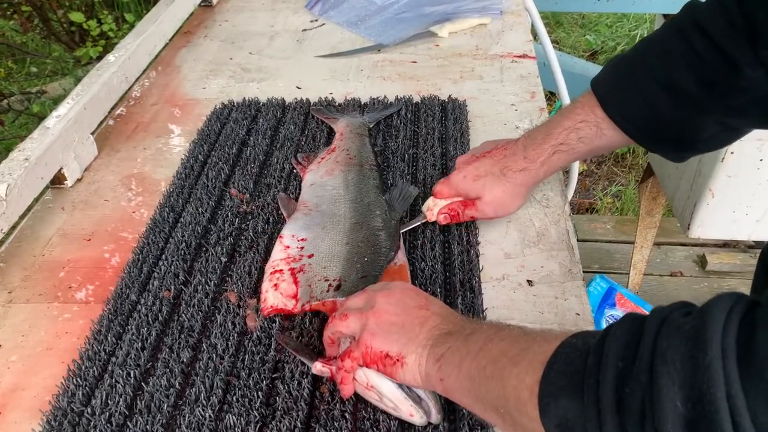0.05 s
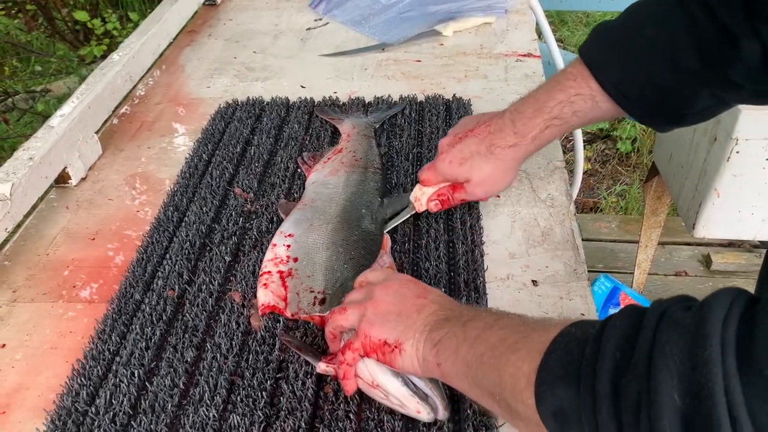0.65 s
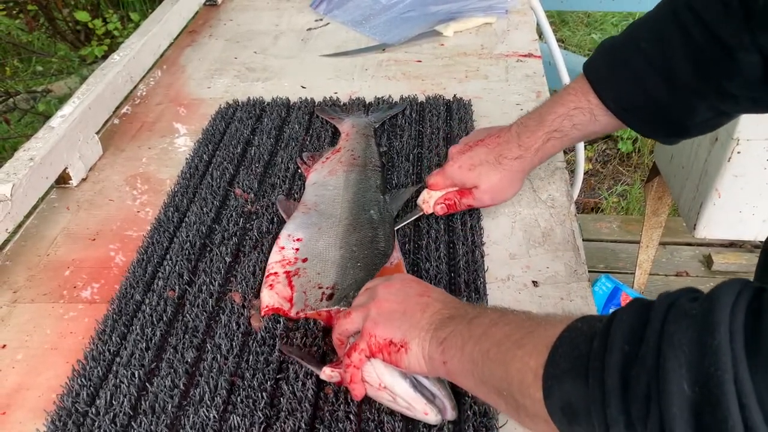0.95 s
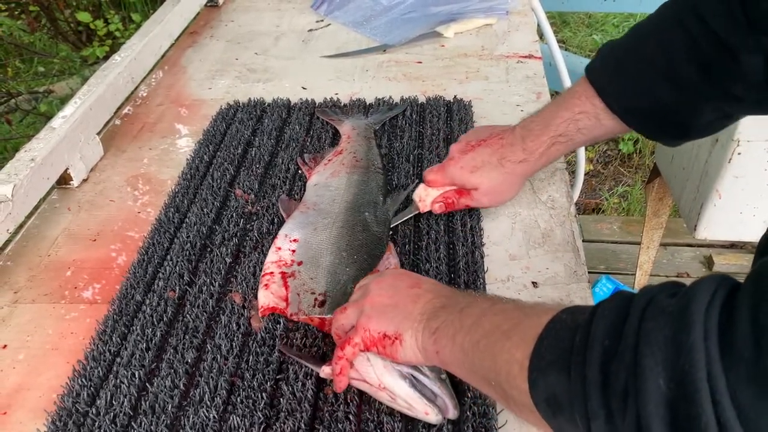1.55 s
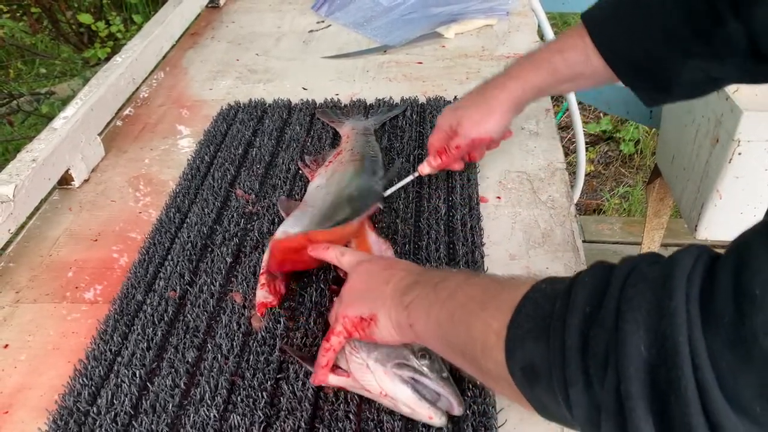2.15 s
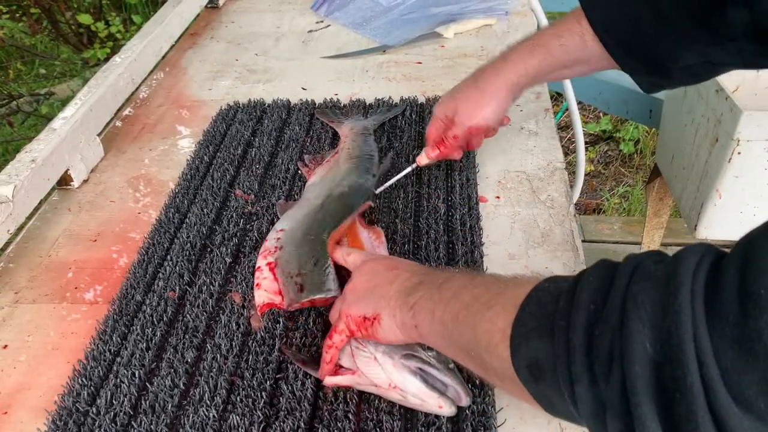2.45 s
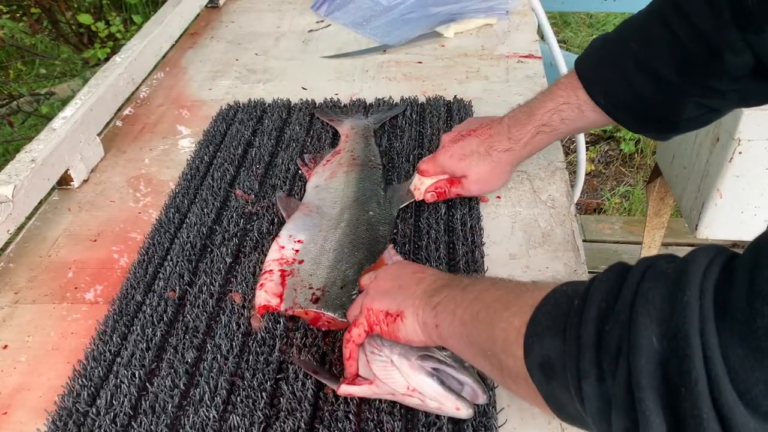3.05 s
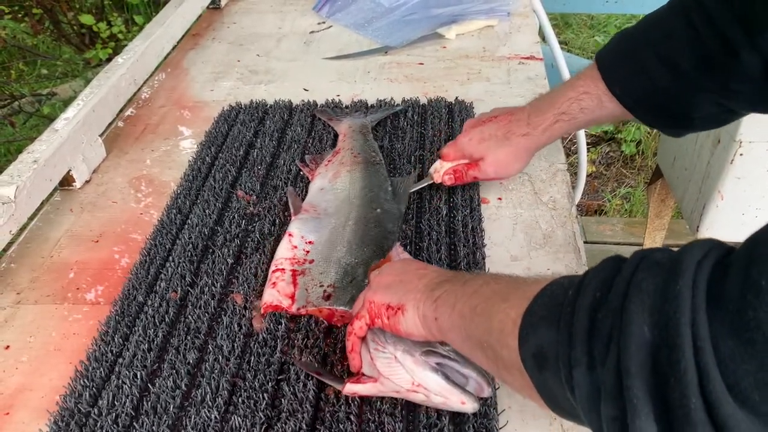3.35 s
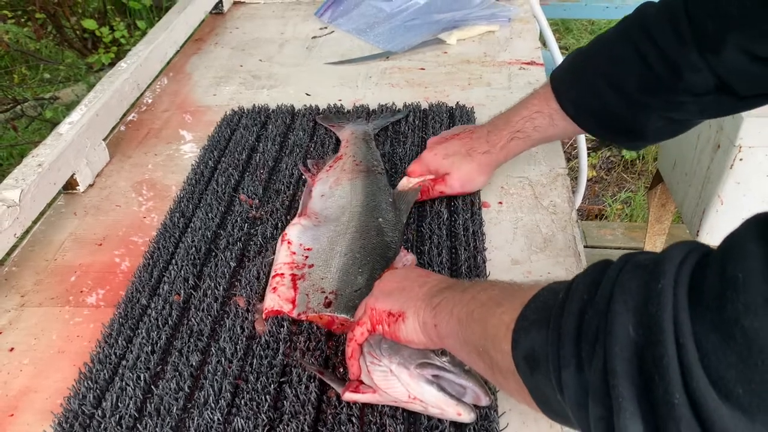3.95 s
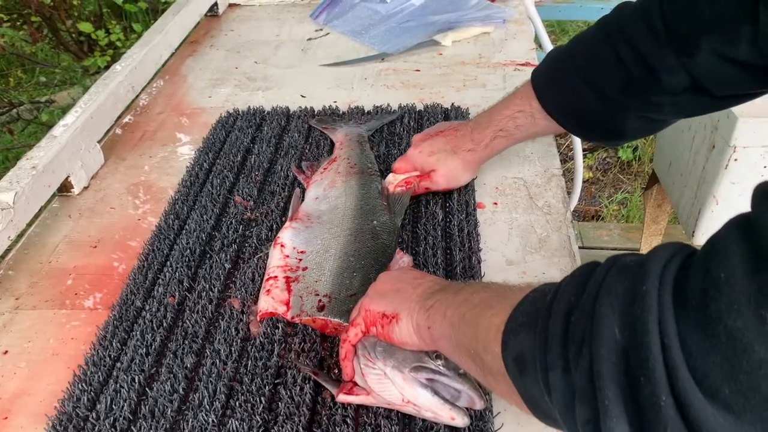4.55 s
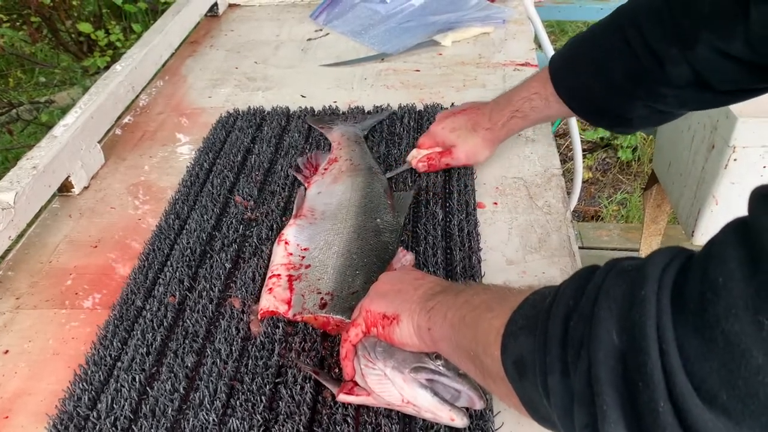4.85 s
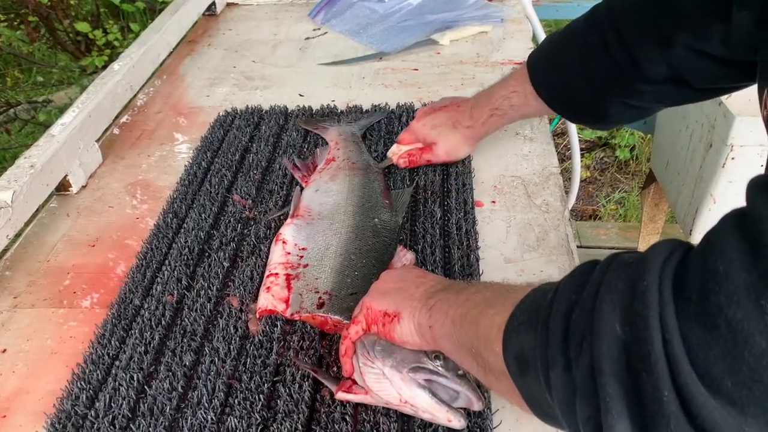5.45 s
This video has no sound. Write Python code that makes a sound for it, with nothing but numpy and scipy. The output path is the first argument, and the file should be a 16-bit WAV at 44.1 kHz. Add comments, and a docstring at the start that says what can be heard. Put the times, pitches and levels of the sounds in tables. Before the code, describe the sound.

Quiet, short knife strokes sizzle through wet fish flesh and click over small bones on a table, over faint outdoor air.

```python
"""An outdoor table with a rubber mat: a filleting knife works along a salmon's backbone in short strokes.
The edge crackles through skin, snaps small bones and sinks into wet flesh that fizzes and pops,
while the table rumbles under the pressure. Something hollow nearby is knocked, chatters and settles.
A palm shifts the fillet twice; faint outdoor air lies behind it all."""
import sys
import numpy as np
from scipy import signal
from scipy.fft import rfft, irfft, next_fast_len
from scipy.io import wavfile

SR = 44100
rng = np.random.default_rng(int(sys.argv[2]) if len(sys.argv) > 2 else 0)


def wav_record(signal):
    """Record a signal, one row per channel, as 16-bit PCM in the file named by sys.argv[1]."""
    frames = np.transpose(np.atleast_2d(signal))
    bounded = np.clip(frames, -1, 1)
    # unit amplitude maps onto the largest positive 16-bit level
    quanta = np.round(bounded * 32767).astype(np.int16)
    wavfile.write(sys.argv[1], SR, quanta)


N = 242853
TIME = np.arange(N) / SR
FFT_SIZE = next_fast_len(N + SR // 10, True)
FREQS = np.maximum(np.fft.rfftfreq(FFT_SIZE, 1 / SR), 1)


def from_db(db):
    """Decibels to gain."""
    return 10 ** (np.asarray(db) / 20)


def rms_one(x):
    """Scale to unit rms."""
    return x / np.sqrt(np.mean(x ** 2) + 1e-20)


def in_time(points):
    """Read an automation curve at every sample."""
    return np.interp(TIME, *np.transpose(points))


def at_freqs(points):
    """Read a curve over log frequency."""
    hz, value = np.transpose(points)
    return np.interp(np.log(FREQS), np.log(hz), value)


def filtered(x, response):
    """Apply a frequency response."""
    return irfft(rfft(x, FFT_SIZE) * response, FFT_SIZE)[..., :N]


def colour(x, eq):
    """Shape a signal with an EQ curve, then scale to unit rms."""
    return rms_one(filtered(x, from_db(at_freqs(eq))))


def drift(rate_hz):
    """Slow random modulation of unit rms."""
    return rms_one(filtered(rng.standard_normal(N), 1 / (1 + (FREQS / rate_hz) ** 2)))


def taps(times, sizes):
    """A train of single impulses."""
    return np.bincount(np.clip(np.round(np.asarray(times) * SR).astype(int), 0, N - 1), sizes, N)


def fade(x, t60):
    """Give each impulse an exponential tail."""
    return signal.lfilter([1], [1, -from_db(-60 / (t60 * SR))], x + 1e-18)


def ring(x, hz, t60):
    """A resonator: a unit impulse starts a decaying sine of height 1."""
    r, w = from_db(-60 / (t60 * SR)), 2 * np.pi * hz / SR
    return signal.lfilter([0, r * np.sin(w)], [1, -2 * r * np.cos(w), r * r], x + 1e-18)


def from_right(x, lag_s):
    """Sound from the right reaches the left microphone later."""
    return np.array([filtered(x, np.exp(-2j * np.pi * FREQS * lag_s)), x])


def lean(x, balance):
    """Pan each frequency by a left-minus-right curve."""
    return filtered(x, from_db(at_freqs(balance) * np.array([[.5], [-.5]])))


def grains(per_s, spread_db, low_hz, high_hz, cycles, count=16):
    """Tiny random ruptures, each ringing a few cycles at one of `count` pitches; unit rms."""
    sizes = from_db(spread_db * np.minimum(rng.exponential(1, N), 4)) * rng.choice([-1, 1], N)
    ruptures = sizes * (rng.random(N) < per_s / SR)
    voice = rng.integers(0, count, N)
    pitches = np.geomspace(low_hz, high_hz, count)
    return rms_one(sum(hz * ring(ruptures * (voice == k), hz, cycles / hz) for k, hz in enumerate(pitches)))


def slips(per_s, t60, drag, spread_db):
    """The blade catches and lets go at uneven intervals over a steady drag; a gain of unit rms."""
    times = np.cumsum(rng.uniform(.3, 1.7, 2000)) / per_s
    sizes = from_db(rng.normal(0, spread_db, len(times))) * (times < N / SR)
    return rms_one(np.hypot(drag, fade(taps(times, sizes), t60)))


def stroke(start, length, swell_db_per_s, release_t60, attack_s=0.0098):
    """Envelope of one stroke: it bites, swells as the blade sinks in, and dies away."""
    t = np.arange(0, length + release_t60, .001)
    bite = np.minimum(t / attack_s, 1)
    swell = from_db(swell_db_per_s * np.minimum(t - length, 0))
    release = from_db(-60 * np.maximum(t - length, 0) / release_t60)
    return np.interp(TIME, start + t, bite * swell * release, right=0)


def knife_work():
    """Envelopes for edge, flesh and table: the strokes ride on the blade's unsteady creep."""
    # pushes of the knife, with relative levels at their end: t/s, length/s, edge/dB, flesh/dB, table/dB
    strokes = [(0.0, 0.0077, -37, -39.5, -41.5), (0.10, 0.023, -61, -68, -65), (1.083, 0.11, -41, -46, -46),
               (1.252, 0.029, -47, -48, -49.5), (1.443, 0.052, -58, -51, -54),
               (1.868, 0.12, -45.5, -54, -52), (2.052, 0.09, -48.5, -59, -70),
               (2.506, 0.15, -49, -51.5, -50), (2.913, 0.025, -46.5, -45, -59),
               (3.143, 0.057, -40, -51.5, -52), (3.244, 0.035, -38.5, -43.5, -45.5),
               (3.791, 0.22, -44.5, -51.5, -51), (4.017, 0.027, -41.5, -45, -45.5),
               (4.12, 0.11, -47.5, -68, -49.5), (4.464, 0.073, -58, -50.5, -50.5),
               (4.611, 0.042, -49, -53, -53), (4.677, 0.077, -43.5, -43.5, -44.5),
               (4.809, 0.029, -35, -42.5, -43.5), (4.851, 0.021, -41.5, -47.5, -46),
               (4.894, 0.012, -51, -48, -46), (5.409, 0.11, -39.5, -48, -44.5)]
    # between strokes the blade stays in the fish and creeps: t/s, relative edge level/dB
    creep = [(0, -52.5), (.25, -55.5), (.55, -59), (.95, -53.5), (1.3, -55), (1.7, -52), (2.0, -56),
             (2.4, -60.5), (2.8, -55), (3.05, -52.5), (3.3, -54.5), (3.5, -59), (3.75, -56.5), (4.2, -52),
             (4.4, -57.5), (4.7, -47), (5.12, -52.5), (5.33, -56)]
    creep_flesh_db, creep_table_db = -59.5, -54.5
    cutting = rubbing = pressing = 0
    for start, length, edge_db, flesh_db, table_db in strokes:
        cutting += from_db(edge_db) * stroke(start, length, swell_db_per_s=30, release_t60=0.21)
        rubbing += from_db(flesh_db) * stroke(start, length, swell_db_per_s=58, release_t60=0.19)
        pressing += from_db(table_db) * stroke(start, length, swell_db_per_s=58, release_t60=0.24)
    wander_db = 1.5 * drift(rate_hz=12)
    return (np.hypot(cutting, from_db(in_time(creep) + wander_db)),
            np.hypot(rubbing, from_db(creep_flesh_db + wander_db)),
            np.hypot(pressing, from_db(creep_table_db + wander_db)))


def edge(gain):
    """Fibres part in a dense wet sizzle that thickens at every slip of the blade."""
    # bright tone of parting fibres: f/Hz, level/dB
    sizzle_eq = [(1500, -40), (2700, 2.5), (3400, 0), (4400, 1), (5300, -5.5), (7000, 4.5), (9500, 3),
                 (12000, 6), (14000, 4), (15600, -1)]
    crackle = colour(grains(7000, spread_db=2, low_hz=2500, high_hz=16900, cycles=3), sizzle_eq)
    clumps = slips(per_s=140, t60=.02, drag=.42, spread_db=3)
    return gain * from_db(-2) * crackle * clumps


def flesh(gain):
    """Wet flesh drags on the blade as an uneven fizz of small bubbles."""
    # midrange tone of wet flesh: f/Hz, level/dB
    fizz_eq = [(250, -8), (450, 3), (650, -3), (900, 4.5), (1100, -1.5), (1400, 0), (2000, -4),
               (3000, -8.5), (4500, -6.5), (8000, -45)]
    fizz = colour(grains(3500, spread_db=4.0, low_hz=367, high_hz=5400, cycles=13, count=40), fizz_eq)
    clumps = slips(per_s=80, t60=0.11, drag=0.12, spread_db=2.5)
    return gain * from_db(-0.96) * fizz * clumps


def table(gain):
    """The slipping blade shakes the table top through fish and mat."""
    # low resonances of the table top: f/Hz, level/dB
    table_eq = [(60, -4), (110, -9), (160, 1.5), (205, 1), (265, -9.5), (330, -3.5), (450, -22.5),
                (800, -51)]
    shudder = grains(700, spread_db=-0.5, low_hz=97.3, high_hz=495, cycles=7.6)
    return gain * colour(shudder, table_eq)


def air():
    """A wide bed of outdoor hiss over a slowly swelling rumble."""
    # tone of the open air: f/Hz, level/dB
    air_eq = [(20, -48), (29, -30), (38, -16.5), (54, 7.5), (75, -3.5), (110, -4.5), (180, -5),
              (300, -10.5), (600, -13), (1200, -16.5), (2500, -19), (4500, -22.5), (7500, -31.5),
              (11000, -49), (15500, -25)]
    # likeness of the two sides, greatest in the bass: f/Hz, correlation
    likeness = [(60, 0.58), (130, 0), (300, 0), (650, 0.24), (1400, 0), (15000, 0)]
    # swells and lulls of the rumble: t/s, bass lift/dB
    rumble_lift = [(0, 0.5), (0.5, 2), (1.1, 1), (1.9, 5), (2.3, -6), (2.8, 0), (3.2, -3), (3.8, 0),
                   (4.3, 0.5), (4.9, 0.5), (5.5, -2.5)]
    alike = at_freqs(likeness)
    mid, side = filtered(rng.standard_normal((2, N)), np.sqrt([1 + alike, 1 - alike]))
    bed = from_db(-47.5 + 1.4 * drift(rate_hz=5.1)) * colour(np.array([mid + side, mid - side]), air_eq)
    rumble = filtered(bed, 1 / (1 + (FREQS / 90) ** 6))  # below 90 Hz
    return bed + (from_db(in_time(rumble_lift)) - 1) * rumble


def burst(times, db, t60, rise_s=.002):
    """Envelope of cracks that take a moment to run through bone, each echoing off the table side."""
    hits = taps(times, from_db(db)) + taps(times + 0.01014, from_db(db - 13.5))
    softened = fade(hits, rise_s) * np.log(1000) / (rise_s * SR)
    return fade(softened, t60)


def snaps():
    """Small bones snap under the edge: a crisp transient, a woody crack and a duller, grainy tail."""
    # breaking bones, with relative layer levels: t/s, crisp/dB, crack/dB, crunch/dB
    breaks = [(0.0084, -21, -33.5, -40.5), (0.119, -35.5, -50, -60), (0.249, -32.5, -50, -63),
              (0.3347, -25, -44, -47), (0.592, -33, -44, -54), (0.7574, -36, -52, -69),
              (0.763, -37, -52, -68), (1.024, -22, -33, -47), (1.093, -23, -38, -43.5),
              (1.1034, -21.5, -34, -53), (1.1122, -22, -48, -44), (1.1273, -19.5, -35, -50),
              (1.141, -26, -43, -50), (1.15, -21, -31, -43), (1.158, -18.5, -28, -54),
              (1.1672, -15.5, -36, -51), (1.178, -25, -43, -59), (1.189, -27, -30, -53),
              (1.27, -35, -45, -52), (1.8537, -26, -41, -63), (1.867, -25, -28.5, -64),
              (1.892, -23.5, -33, -54), (1.929, -29, -44, -56), (1.937, -18.5, -33, -54),
              (1.9643, -19, -34, -54), (1.9799, -21.5, -33.5, -48), (2.095, -31.5, -50, -62),
              (2.246, -48, -59, -68), (2.2627, -39, -54, -66), (2.6198, -22, -33, -36.5),
              (2.6896, -27, -30, -45), (2.9148, -29.5, -34, -42), (2.9226, -28.5, -31, -39.5),
              (3.109, -28, -39, -47), (3.152, -29, -48, -56), (3.1618, -27, -43, -59),
              (3.172, -19.5, -45, -62), (3.1966, -25, -39, -58), (3.2273, -25, -40, -57),
              (3.2432, -27, -28.5, -45), (3.262, -27, -44, -55), (3.27, -24, -36, -48),
              (3.277, -32, -46, -56), (3.6592, -38.5, -51, -57), (3.836, -32, -44, -60),
              (3.8577, -33, -50, -58), (3.8653, -31.5, -47, -58), (3.954, -25.5, -49, -61),
              (3.9781, -31, -50, -65), (3.9966, -28, -48, -61), (4.6005, -32, -46, -56),
              (4.6778, -32, -48, -59), (4.6898, -26, -43, -61), (4.709, -31, -52, -56),
              (4.7133, -23, -39, -45), (4.7446, -24, -38, -52), (4.798, -27, -34, -50),
              (4.821, -31, -34, -48), (4.8326, -24, -31, -45), (4.838, -26, -30, -45),
              (4.857, -27, -31, -54), (4.871, -36, -31, -50), (4.9016, -29, -31, -56),
              (4.906, -27, -28, -55), (4.9593, -30, -36, -49), (4.976, -37, -50, -64),
              (5.02, -27.5, -43, -66), (5.171, -25, -54, -67), (5.4012, -29, -37, -51)]
    # tones of the bright transient, the woody crack and the bone crunch: f/Hz, level/dB
    crisp_eq = [(1500, -28), (2700, -1), (4400, -5), (5400, -15), (7000, -0.5), (9500, 4), (12000, 7),
                (14000, 4), (15600, 7)]
    crack_eq = [(250, -7), (600, 5.5), (1000, 7), (1700, -1.5), (3000, 4), (4400, 4.5), (6500, -4.5),
                (9000, 12), (14000, -35)]
    crunch_eq = [(600, 9.5), (1500, 1.5), (2400, 21.5), (4400, 3.5), (6000, -1), (9000, -10)]
    times, crisp_db, crack_db, crunch_db = np.transpose(breaks)
    crisp = burst(times, crisp_db, t60=0.0086) * colour(rng.standard_normal(N), crisp_eq)
    crack = burst(times, crack_db, t60=0.0063) * colour(rng.standard_normal(N), crack_eq)
    grit = colour(grains(9000, spread_db=1, low_hz=400, high_hz=12000, cycles=3), crunch_eq)
    crunch = fade(taps(times, from_db(crunch_db + 2)), t60=0.067) * grit
    return crisp + crack + crunch


def short_rings():
    """Short ringing sounds: wet pops, pings of cracking bone, low table thuds and one dry tap."""
    # decaying tones of the pops, pings, thuds and tap: t/s, level/dB, f/Hz, t60/s
    tones = [(0.336, -38.5, 2120, 0.051), (0.336, -42, 317, 0.11), (0.338, -32, 172, 0.13),
             (0.593, -36, 2450, 0.025), (0.690, -37.5, 700, 0.016), (1.026, -26.5, 1800, 0.0044),
             (1.048, -31, 1830, 0.0089), (1.151, -35, 6240, 0.011), (1.158, -37, 5940, 0.013),
             (1.640, -35, 89.5, 0.11), (1.937, -41, 730, 0.022), (1.938, -34, 178, 0.09),
             (1.964, -37, 830, 0.016), (1.965, -38, 217, 0.088), (1.98, -36.5, 915, 0.02),
             (1.981, -35, 168, 0.13), (2.149, -26, 2900, 0.0077), (2.621, -30, 2020, 0.011),
             (2.691, -36, 3340, 0.0046), (2.6903, -25.5, 4430, 0.014), (2.6905, -28, 6500, 0.0035),
             (4.734, -34, 1140, 0.023), (4.745, -36, 850, 0.025), (4.799, -28, 6100, 0.011),
             (4.859, -34, 1150, 0.025), (4.867, -33, 1440, 0.025), (4.903, -29, 4750, 0.01),
             (4.9065, -22, 4440, 0.012), (5.1318, -30, 3060, 0.0044), (5.1314, -32, 1530, 0.011),
             (5.132, -26, 1080, 0.017)]
    return sum(ring(taps([start], [from_db(db)]), hz, t60) for start, db, hz, t60 in tones)


def knock(swell_t60=0.033, wall_t60=0.16, wall_rise_s=0.0022, bass_hz=430):
    """A soft, chattering blow swells in the modes of a hollow body, whose walls ring on diffusely."""
    # contacts of the chatter, in relative levels: t/s, blow/dB, after-ring/dB, its bass lift/dB
    contacts = [(1.584, -29, -50, 0), (1.587, -14, -22, -7), (1.5921, -4, -25, 0), (1.599, -27, -25, -1),
                (1.614, -22, -29, -2), (1.6222, -22.5, -39, 2), (1.636, -29, -46, 0),
                (1.7286, -35, -30.5, -10)]
    # modes of the hollow body: f/Hz, relative level/dB, t60/s, left-side lag/s
    modes = [(220, -15, 0.031, 0.0012), (330, -22.5, 0.21, 0.00024), (456, 7.5, 0.015, 0.00053),
             (603, -23, 0.107, 0.00018), (754, -25, 0.046, 0.00018), (820, -32, 0.095, 0.0002),
             (917, -30, 0.14, 0.0004), (1017, -26, 0.11, 0.00032), (1107, -10, 0.029, 0.00017),
             (1297, 11, 0.0061, 0.00022), (1357, -17, 0.085, 0.00015), (1442, -5.5, 0.028, 0.00018),
             (1620, -24, 0.2, 0.00019), (1800, -10.5, 0.018, 0.00016), (2135, -11.5, 0.017, 0.0001),
             (2410, -36, 0.16, 0.000098)]
    # tone of the walls' after-ring: f/Hz, level/dB
    wall_eq = [(100, -52), (190, -44), (265, 0.5), (330, -5), (450, 4), (620, -0.5), (770, -8), (920, -4),
               (1370, -6.5), (1650, -12.5), (2300, -15), (2750, -24.5), (7000, -34), (11000, -67)]
    # the body throws its low tones left and a band near 1460 Hz right: f/Hz, left minus right/dB
    spread = [(250, 0), (330, 3), (450, 3), (700, 0), (1300, 1), (1460, -3), (2000, 2)]
    times, blow_db, ring_db, bass_db = np.transpose(contacts)
    body = np.zeros((2, N))
    for hz, db, t60, lag_s in modes:
        blows = np.array([taps(times + lag_s, from_db(blow_db)), taps(times, from_db(blow_db))])
        # the contact feeds each mode over a few cycles
        push = ring(blows, hz, swell_t60) * 2 * np.log(1000) / (swell_t60 * SR)
        body += from_db(db) * ring(push, hz, t60)
    # a body this small radiates little bass
    body = signal.sosfilt(signal.butter(3, 240, "high", fs=SR, output="sos"), body)
    walls = colour(rng.standard_normal((2, N)), wall_eq)
    bass = filtered(walls, 1 / (1 + (FREQS / bass_hz) ** 8))
    rise = np.exp(-1 / (wall_rise_s * SR))
    for band, db in ((bass, ring_db + bass_db), (walls - bass, ring_db)):
        decay = np.sqrt(fade(taps(times, from_db(db) ** 2), wall_t60 / 2))  # tails add in power
        body += band * signal.lfilter([1 - rise], [1, -rise], decay)
    return lean(body, spread)


def handling():
    """Wet skin slides under the palm with a soft, low rub."""
    # the hand shifts the fillet: centre t/s, half length/s, level/dB
    shifts = [(2.565, 0.037, -48.5), (2.886, 0.029, -46.5)]
    # muffled tone of rubbed skin: f/Hz, level/dB
    skin_eq = [(150, -21), (270, 7), (340, 6), (450, -1.5), (700, -43), (2000, -34)]
    swell = sum(from_db(db) * np.exp(-.5 * ((TIME - centre) / half) ** 2) for centre, half, db in shifts)
    return swell * colour(rng.standard_normal(N), skin_eq)


def surroundings(x, level_db, t60, wall_hz):
    """Table, railing and wall scatter short, dull reflections, different on each side."""
    t = TIME[:SR // 5]
    scatter = rng.standard_normal((2, len(t))) * from_db(-60 * t / t60) * (t > .002)  # 2 ms pre-delay
    scatter /= np.sqrt(np.sum(scatter[0] ** 2))
    scatter = signal.sosfilt(signal.butter(2, wall_hz, fs=SR, output="sos"), scatter)
    return from_db(level_db) * signal.fftconvolve(x[None], scatter, axes=1)[:, :N]


def scene():
    """Knife and fish sit just right of centre, amid their reflections, the knock and the open air."""
    # the crackle's sheen comes and goes, finest toward the tail of the fish: t/s, top lift/dB
    fineness = [(0, 0), (1.09, -2), (1.16, -12), (1.7, 3), (1.9, -15), (2.15, 3), (2.7, -5), (3.17, -5),
                (3.28, 2), (4.0, 4.5), (4.8, 3), (5.5, 5)]
    cutting, rubbing, pressing = knife_work()
    blade = edge(cutting) + snaps()
    top = filtered(blade, 1 / (1 + (13000 / FREQS) ** 12))  # above 13 kHz
    blade += (from_db(in_time(fineness)) - 1) * top
    wet = flesh(rubbing) + handling()
    fish_and_table = wet + short_rings() + table(pressing)
    direct = from_right(blade, lag_s=0.000184) + from_right(fish_and_table, lag_s=0.00015)
    reflections = surroundings(blade + wet, level_db=-1.0, t60=0.036, wall_hz=7200)
    return direct + reflections + knock() + air()


def record(dry):
    """A microphone pair that leans left in the low mids, with a steep high cut."""
    # the left microphone hears the low mids more strongly: f/Hz, left minus right/dB
    balance = [(60, 0), (110, 2.5), (200, 5), (400, 2), (700, 5.5), (1300, 1.5), (4000, -0.5)]
    cutoff_hz = 15950
    high_cut = 1 / np.sqrt(1 + (FREQS / cutoff_hz) ** 240)
    return filtered(lean(dry, balance), high_cut)


dry = scene()
out = record(dry)
wav_record(out)
```